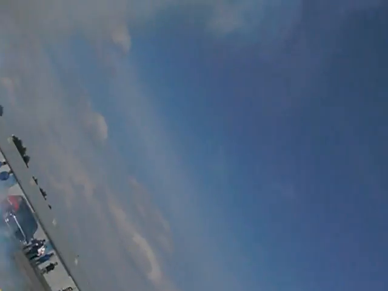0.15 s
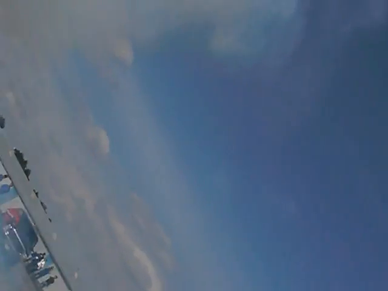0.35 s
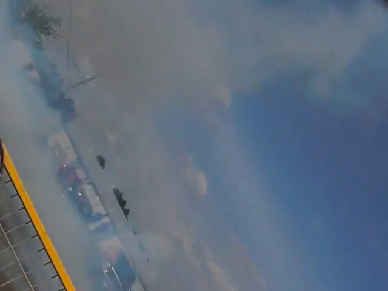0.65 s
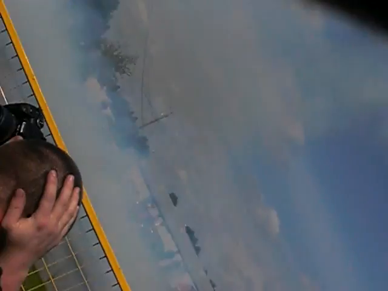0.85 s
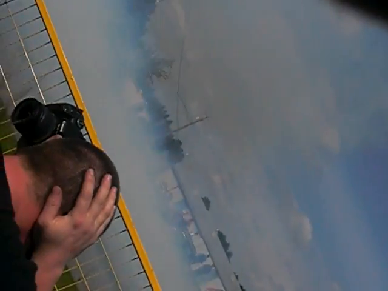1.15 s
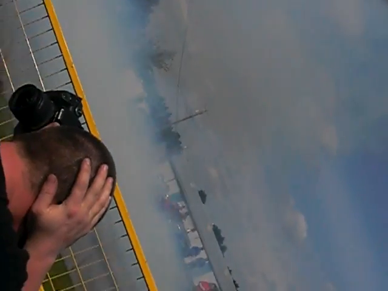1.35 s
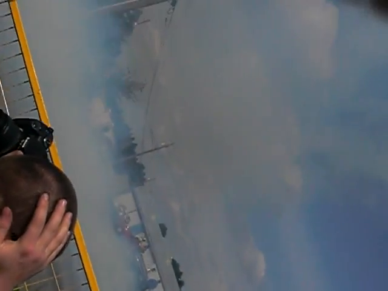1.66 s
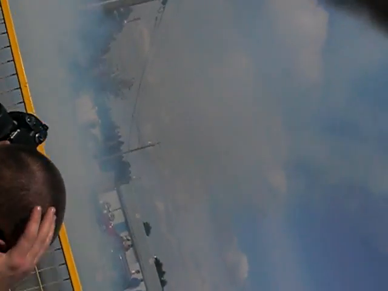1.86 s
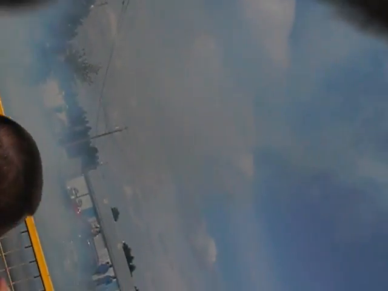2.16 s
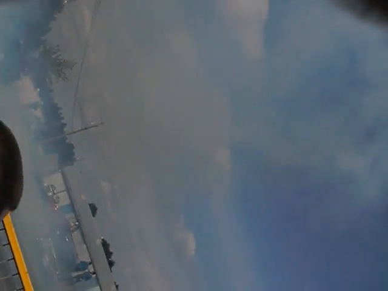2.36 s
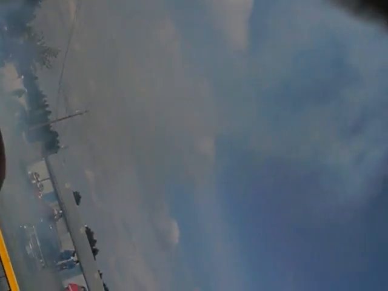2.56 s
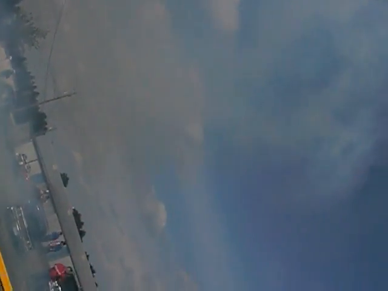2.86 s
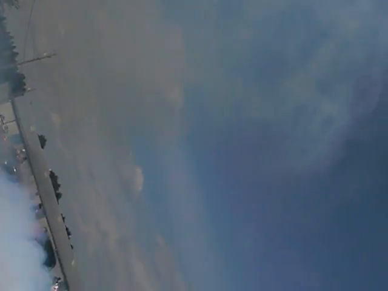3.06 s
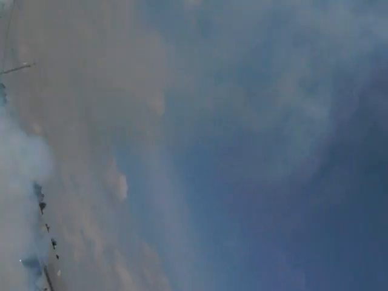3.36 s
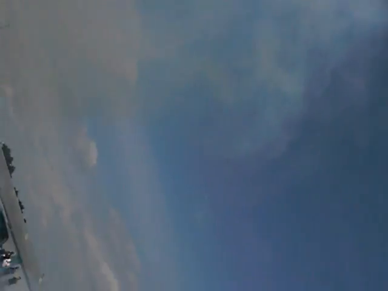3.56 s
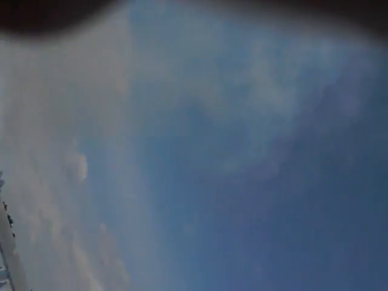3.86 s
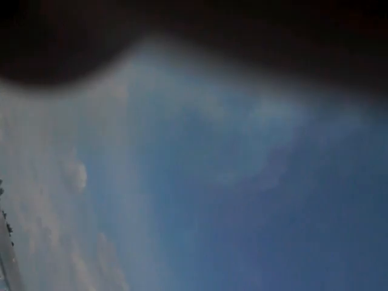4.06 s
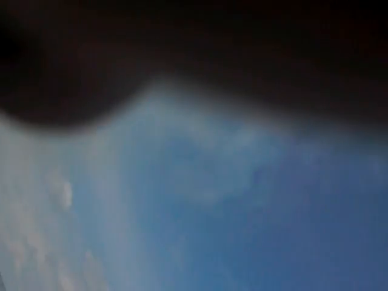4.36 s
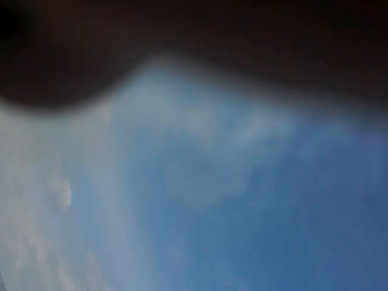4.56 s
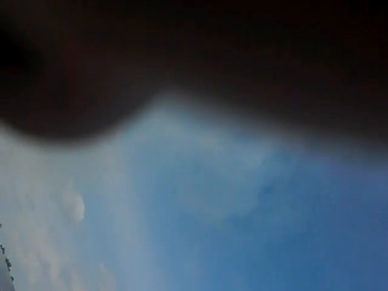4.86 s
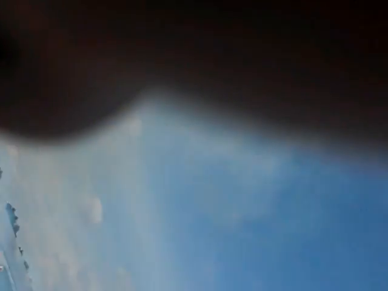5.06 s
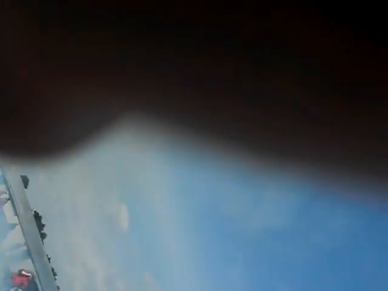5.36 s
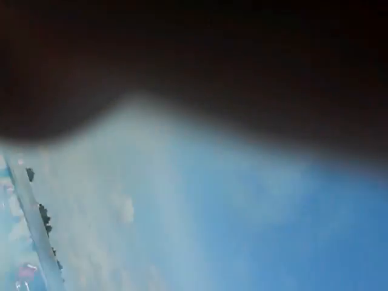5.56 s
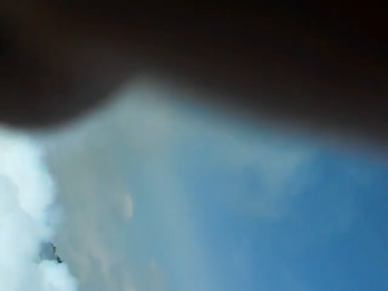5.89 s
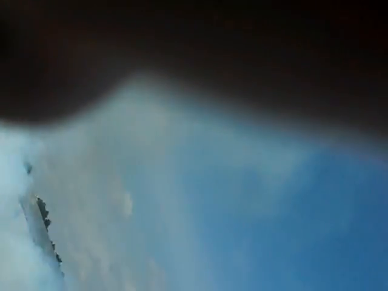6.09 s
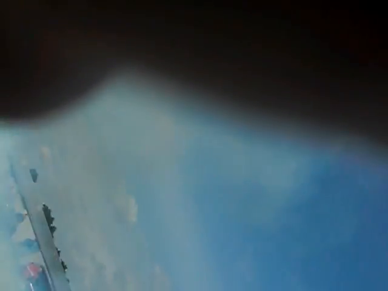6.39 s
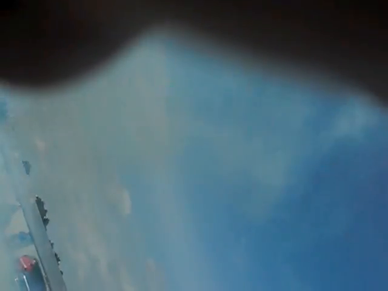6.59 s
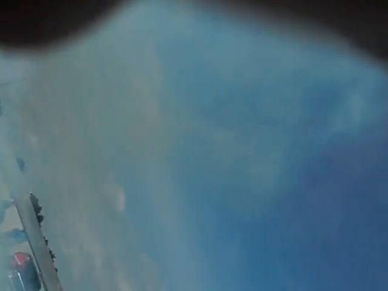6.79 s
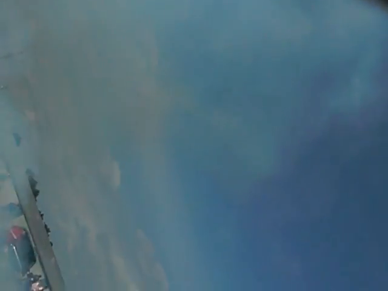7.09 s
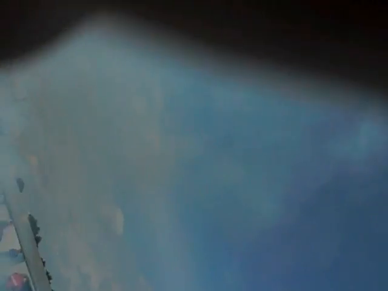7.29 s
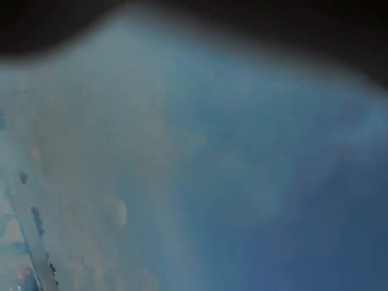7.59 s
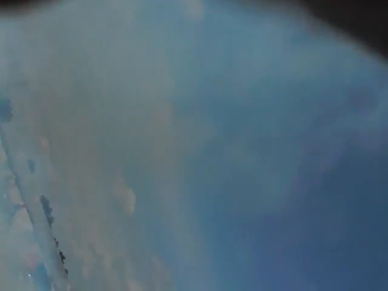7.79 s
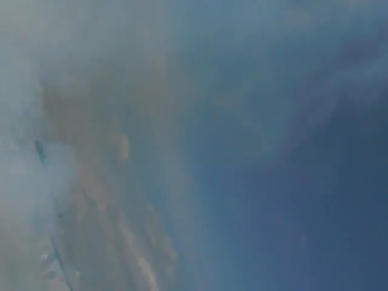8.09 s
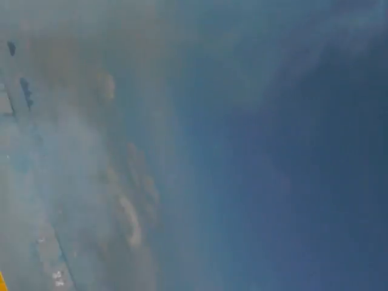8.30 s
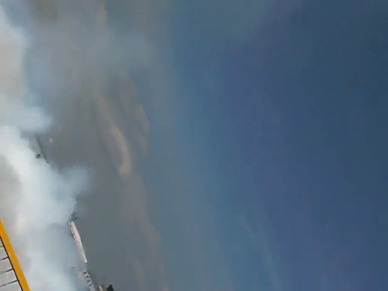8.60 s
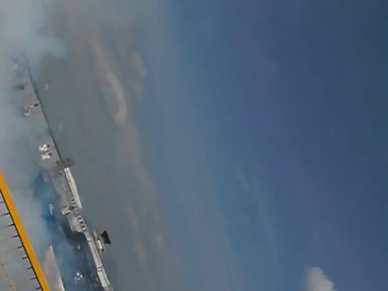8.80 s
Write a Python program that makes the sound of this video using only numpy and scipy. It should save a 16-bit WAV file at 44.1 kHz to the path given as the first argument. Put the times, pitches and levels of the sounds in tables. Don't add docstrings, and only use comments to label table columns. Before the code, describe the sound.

A jet turbine idles outdoors with a roaring, hissing exhaust and thin high whine, broken by runs of sharp, distorted bangs that drag the whine down.

```python
import sys
import numpy as np
from scipy import signal
from scipy.fft import rfft, irfft, next_fast_len
from scipy.io import wavfile
from scipy.ndimage import uniform_filter1d, map_coordinates

SR = 44100
rng = np.random.default_rng(int(sys.argv[2]) if len(sys.argv) > 2 else 0)


def rack_gain(trim_db):
    fader = np.asarray(trim_db, float)
    return 10 ** (fader / 20)


def generate_wav(sig):
    pcm = np.round(np.clip(np.atleast_2d(sig).T, -1, 1) * 32767).astype(np.int16)
    wavfile.write(sys.argv[1], SR, pcm)


N = 394254


def unit(x):
    return x / np.sqrt(np.mean(x ** 2) + 1e-20)


def curves(rows):
    s, *columns = np.transpose(rows)
    return [np.interp(np.arange(N) / SR, s, column) for column in columns]


def wobble(rate):
    knots = rng.standard_normal(int(N * rate / SR) + 4)
    return map_coordinates(knots, [np.arange(N) * rate / SR])


def filtered(x, response):
    m = next_fast_len(N + SR // 2)
    hz = np.fft.rfftfreq(m, 1 / SR) + 1e-3
    return irfft(rfft(x, m) * response(hz), m)[..., :N]


def rush(spectrum, patchy_db):
    z = signal.stft(rng.standard_normal(N), nperseg=512)[2]
    field = uniform_filter1d(rng.standard_normal(z.shape), 6, 0)
    field = uniform_filter1d(field, 8, 1)
    x = signal.istft(z * rack_gain(patchy_db * unit(field)), nperseg=512)[1][:N]
    f, db = np.transpose(spectrum)
    return unit(filtered(x, lambda hz: rack_gain(np.interp(np.log(hz), np.log(f), db))))


# t/s, flame length/s, overload length/s, boom level/dB, sag of the blade tone/Hz
BANGS = [(0, 0.033, 0.051, -15, 317), (.133, 0.051, .054, -11, 133.3), (.466, 0.046, .066, -10, 215.5),
         (.646, 0.047, 0.074, -8.5, 149.9), (3.218, 0.018, 0.044, -1, 46.1), (3.357, 0.047, 0.064, -6, 180),
         (3.513, 0.051, 0.063, -7.5, 124.3), (3.809, 0.049, 0.055, -8.5, 172.3),
         (3.956, .054, .072, -4, 206.4), (4.104, 0.056, 0.061, -15, 82.6), (4.519, 0.049, 0.057, -6, 222.2),
         (4.671, 0.054, 0.067, -6, 158.3), (5.059, 0.048, 0.052, -7.5, 197), (5.223, .044, .052, -4, 118.4),
         (5.391, 0.042, 0.051, -4, 140.3), (7.08, 0.033, .041, -5, 85.6), (7.221, 0.048, 0.059, -8, 168.4),
         (7.685, 0.024, 0.044, -4, 104), (8.119, 0.026, 0.039, -0.5, 107.7), (8.739, 0.039, .041, 0, 142),
         (8.923, 0.071, .035, 0, 140)]
# t/s, flame length/s, overload length/s, boom level/dB, flame level/dB
LATE_POP = (.2, .022, .022, -6, -14)
# f/Hz, level/dB per Hz
FLAME = [(100, -40), (300, -3.5), (600, 4.5), (1200, 4.5), (2500, 7), (5000, -2.5), (8000, -15),
         (10000, -29), (13000, -5.5)]
# f/Hz, level/dB per Hz
BOOM = [(60, 0), (150, -4.5), (270, -10.5), (420, -2), (800, -15.5), (2500, -18.5), (6000, -33),
        (13000, -47)]
FLAME_DB, CLAMP_DB = -6.5, 16


def afterburner():
    t = np.arange(N) / SR
    flame, boom, overload = np.zeros((3, N))
    light_offs = [(*bang[:4], FLAME_DB) for bang in BANGS] + [LATE_POP]
    for s, burn, swing, boom_db, flame_db in light_offs:
        part = slice(round(s * SR), round((s + .3) * SR))
        u = t[part] - s
        ignition = np.clip(u / .005, 0, 1)
        burning = ignition * np.clip((burn - u) / .003 + .5, 0, 1)
        after = np.clip(u - swing, 0, None)
        clamp = np.clip(after / .002, 0, 1)
        decay_db = 60 * after / 0.17
        flame[part] += rack_gain(flame_db) * burning
        boom_level = rack_gain(boom_db - 5.7 * burning - CLAMP_DB * clamp - decay_db)
        boom[part] += np.clip(u / 0.00075, 0, 1) * boom_level
        overload[part] += np.clip(u / 0.00082, 0, 1) * (1 - clamp)
    tearing = rack_gain(-3.5 + 3.5 * wobble(120))
    pipe_hz = 265 + 55 * wobble(60)
    pipe = np.sin(2 * np.pi * np.cumsum(pipe_hz) / SR)
    flames = flame * tearing * rush(FLAME, patchy_db=0.8)
    booms = rack_gain(-5.5) * boom * unit(pipe + 0.79 * rush(BOOM, patchy_db=1.5))
    return flames + booms, overload


def last_bang():
    t = np.arange(N) / SR
    s, burn, _, _, sag_hz = np.transpose(BANGS)
    latest = np.clip(np.searchsorted(s, t, "right") - 1, 0, None)
    return t - s[latest], burn[latest], sag_hz[latest]


# t/s, level/dB
THRUST = [(0, 3), (.3, 2), (.92, 1.5), (1.3, 1), (1.64, 2.5), (2.02, 1), (2.29, 3.5), (2.6, 0.5),
          (3.19, 0.5), (3.4, -0.5), (3.7, 1), (4.3, -0.5), (5.4, -0.5), (5.9, -1.5), (6.5, -0.5),
          (6.95, 0.5), (7.5, -1.5), (8.94, -1.5)]
RECOVER_DB_PER_S, ECHO_S, FULL_BURN_S = 3.5, 0.13, 0.045


def swings():
    since, burn, _ = last_bang()
    swing_db = curves(THRUST)[0] + RECOVER_DB_PER_S * since
    echo = burn / FULL_BURN_S * np.exp(-since / ECHO_S)
    return swing_db, echo


# level just after a bang/dB, share of thrust and gain swings/1, echo of a bang/dB
LAYERS = [
    (-28, 0.78, 4),
    (-34.5, 1.114, 8),
    (-43.5, 1, 6),
    (-48, 1.16, 9.5),
]
# f/Hz, level/dB per Hz
RUMBLE = [(60, -18.5), (100, -9.5), (166, -3), (205, -4.5), (240, -1.5), (300, -2), (360, -6.5), (400, -6),
          (470, -10.5), (520, -23), (560, -38), (700, -120)]
# f/Hz, level/dB per Hz
ROAR = [(400, -64), (500, -3.5), (580, -4), (660, -1), (890, 4), (1150, 0), (1680, -3.5), (2450, 0),
        (2800, -4), (3300, -9.5), (4300, -45), (7000, -120)]
# f/Hz, level/dB per Hz
HISS = [(2600, -120), (3000, 5), (3600, 7.5), (4800, 4), (5800, 3.5), (6600, -3), (7400, -46), (8000, -120)]
# f/Hz, level/dB per Hz
AIR = [(6000, -120), (6600, -3), (7500, -6), (8500, -10.5), (9500, -9), (10300, -9.5), (11300, -10),
       (12300, 0.5)]


def exhaust():
    swing_db, echo = swings()
    levels_db = [db + share * swing_db + echo_db * echo for db, share, echo_db in LAYERS]
    rumble_db, roar_db, hiss_db, air_db = levels_db
    throb = wobble(14)
    rumble = rack_gain(rumble_db + 0.31 * throb + 0.36 * wobble(40)) * rush(RUMBLE, patchy_db=1.0)
    roar = rack_gain(roar_db + 0.65 * throb) * rush(ROAR, patchy_db=0.0)
    hiss = rack_gain(hiss_db + 0.2 * throb) * rush(HISS, patchy_db=1.25)
    air = rack_gain(air_db + .4 * throb) * rush(AIR, patchy_db=.4)
    return rumble + roar + hiss + air


# t/s, f/Hz
IDLE = [(0, 5965), (1, 5953), (1.25, 5927), (1.9, 5992), (2.1, 5926), (2.4, 5970), (3.2, 5961), (6.4, 5992),
        (7, 5981), (8.94, 6012)]
# t/s, level/dB
BLADES = [(0, -38.5), (.55, -45), (.9, -42.5), (1.42, -58), (1.57, -38), (2.05, -47.5), (2.3, -40),
          (2.5, -45), (3.0, -34.5), (3.2, -40.5), (3.45, -50), (4.05, -45), (4.3, -45), (4.95, -44),
          (6.3, -47.5), (6.52, -35), (6.9, -45), (8.94, -46.5)]
EDDIES = [.3, 1.21, 1.36, 1.46, 1.77, 1.93, 2.07, 2.2, 2.36, 2.58, 2.73, 2.92, 3.33, 4.3, 4.8, 4.86, 5.48,
          5.6, 5.92, 6.14, 6.33, 6.82, 7.45, 7.55, 7.63, 7.88, 8.33, 8.44, 8.6, 8.67]
EDDY_S, EDDY_DB = .012, 11
SAG_FADE_S, HUNT_S, SAG_START_S, DEEPEST_S = .179, .488, .05, .097


def compressor():
    since, _, sag_hz = last_bang()
    damping = np.exp((SAG_START_S - since) / SAG_FADE_S)
    hunting = np.cos(2 * np.pi * (since - DEEPEST_S) / HUNT_S)
    hz = curves(IDLE)[0] - sag_hz * damping * hunting
    phase = 2 * np.pi * np.cumsum(hz + 8 * wobble(40)) / SR
    t = np.arange(N) / SR
    fade_db = EDDY_DB * sum(np.exp(-((t - s) / EDDY_S) ** 2 / 2) for s in EDDIES)
    tone = rack_gain(2.1 * wobble(26) + 2.5 * wobble(70)) * np.sin(phase)
    octave = rack_gain(-21.5 + 2.2 * wobble(20)) * np.sin(2 * phase)
    return rack_gain(curves(BLADES)[0] - 1.0 - fade_db) * unit(tone + octave)


# t/s, centre f/Hz, level/dB
INTAKE = [(0, 8050, -45), (.8, 8700, -53), (1.3, 8320, -51), (1.9, 7800, -53), (2.8, 7880, -58),
          (3.2, 8100, -58), (6, 7560, -85), (7, 8020, -58), (7.6, 7580, -73), (8.3, 7100, -49.5),
          (8.94, 7070, -52)]


def intake():
    hz, db = curves(INTAKE)
    width = [(20, 0), (500, -1), (900, -4), (1400, -10), (2000, -21), (3000, -50)]  # f/Hz, level/dB
    carrier = np.sin(2 * np.pi * np.cumsum(hz) / SR)
    return rack_gain(db) * unit(rush(width, patchy_db=0.5) * carrier)


# t/s, first cancelled f/Hz, reflected share/1
HAND = [
    (0, 3080, 0.34),
    (.9, 3780, 0.27),
    (1.6, 3470, 0.38),
    (2.3, 3400, 0.48),
    (4.3, 3580, 0.25),
    (5.8, 3880, 0.38),
    (7.5, 3200, 0.42),
    (8.1, 3240, 0.57),
    (8.5, 2700, 0.44),
    (8.94, 2540, 0.46),
]


def hand(x):
    null_hz, share = curves(HAND)
    late = map_coordinates(x, [np.arange(N) - SR / (2 * null_hz)], mode="nearest")
    return (x + share * late) / np.sqrt(1 + share ** 2)


# f/Hz, level/dB per Hz
SHAKE = [(25, -27), (45, -21), (70, -3), (100, 1.5), (140, -31), (200, -58)]
BUFFET_DB, BUFFET_SWING, BUFFET_ECHO_DB = -39.5, 0.18, 11


def buffet():
    swing_db, echo = swings()
    level_db = BUFFET_DB + BUFFET_SWING * swing_db + BUFFET_ECHO_DB * echo + 1.5 * wobble(3.7)
    return rack_gain(level_db + 1.2 * wobble(36)) * rush(SHAKE, patchy_db=-3.5)


# f/Hz, level/dB per Hz
SELF_NOISE = [(9500, -120), (10300, -14), (11300, -3), (12300, 1)]
SELF_NOISE_DB = -51


def self_noise():
    return rack_gain(SELF_NOISE_DB) * rush(SELF_NOISE, patchy_db=0)


def scene():
    bangs, overload = afterburner()
    engine = (exhaust() + compressor() + intake()) * (1 + 2.03 * overload)
    return (hand(engine + bangs) + buffet() + self_noise())[None]


def roll_off(x):
    return signal.sosfilt(signal.butter(12, 13110, fs=SR, output="sos"), x)


def record(dry):
    bass_cut = lambda hz: -hz ** 2 / (60 ** 2 - hz ** 2 + 1.3j * 60 * hz)
    x = filtered(dry, bass_cut)
    top, hard = .42, 2.6
    x = x / (1 + np.abs(x / top) ** hard) ** (1 / hard)
    droop = lambda hz: -hz ** 2 / (66 ** 2 - hz ** 2 + 1.45j * 66 * hz)
    treble = lambda hz: (1 + 1j * hz / 6000) / (1 - (hz / 6500) ** 2 + 1.1j * hz / 6500)
    notch = lambda hz: 1 - 1j * hz * 90 / (7735 ** 2 - hz ** 2 + 1j * hz * 90)
    mix = filtered(x, lambda hz: droop(hz) * treble(hz) * notch(hz) * (hz < 12050))
    return roll_off(mix)


dry = scene()
out = record(dry)
generate_wav(out)
```